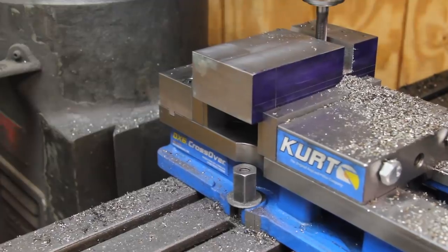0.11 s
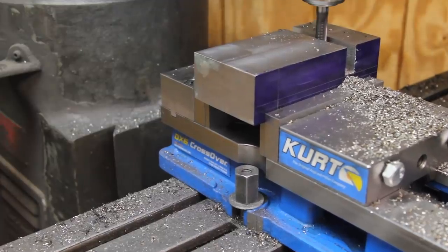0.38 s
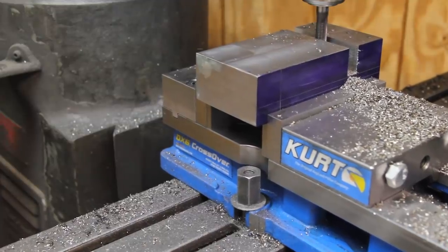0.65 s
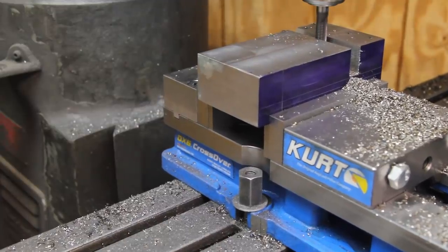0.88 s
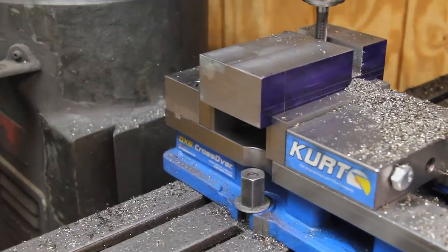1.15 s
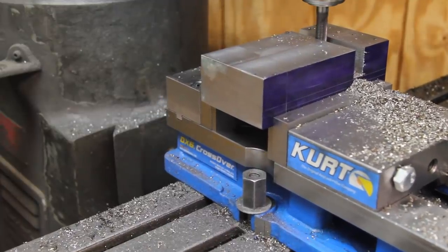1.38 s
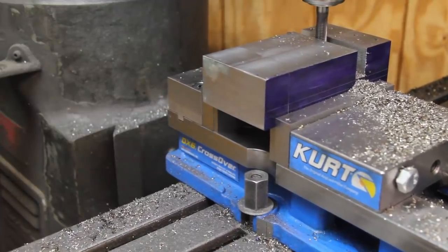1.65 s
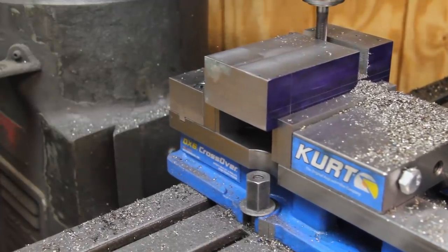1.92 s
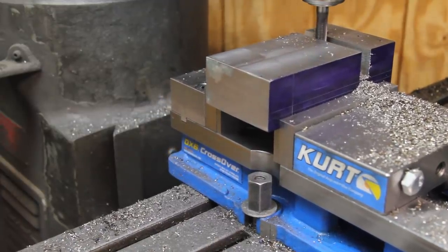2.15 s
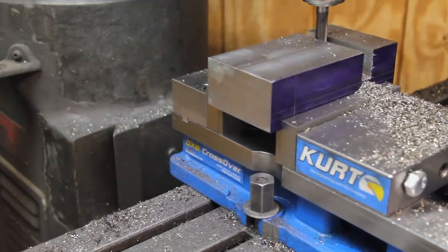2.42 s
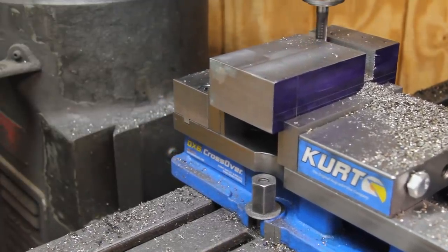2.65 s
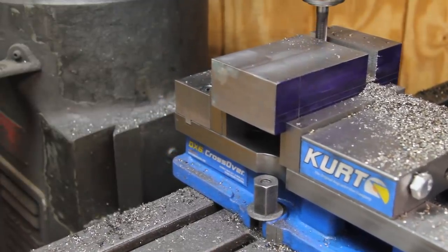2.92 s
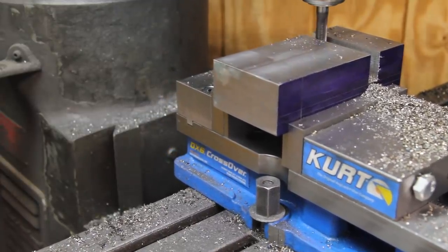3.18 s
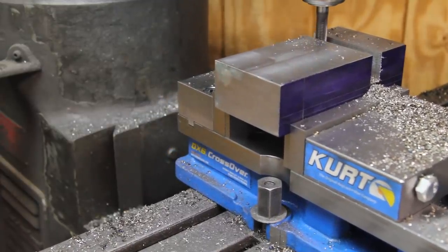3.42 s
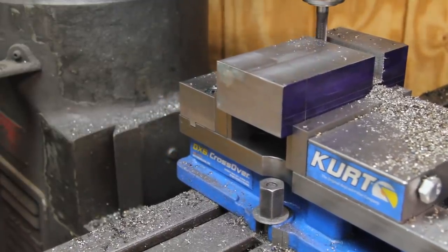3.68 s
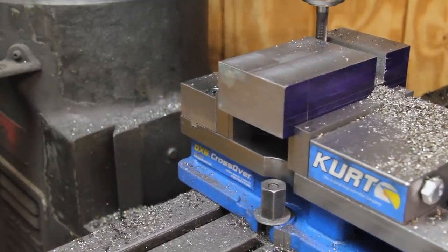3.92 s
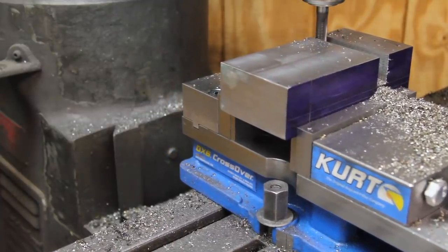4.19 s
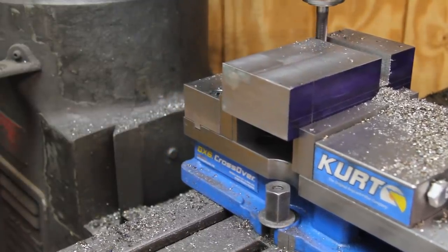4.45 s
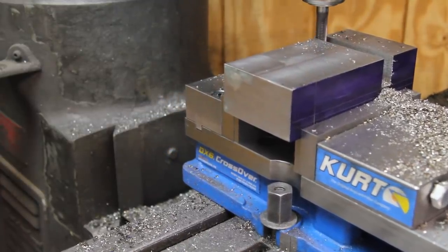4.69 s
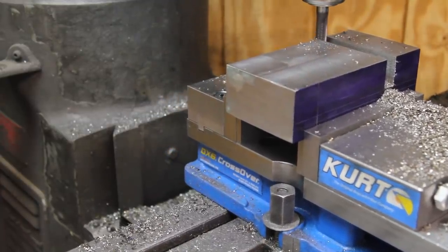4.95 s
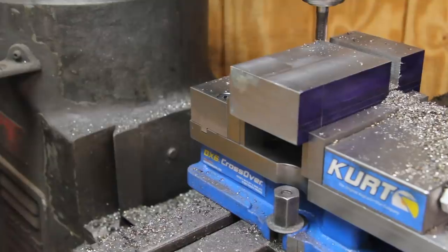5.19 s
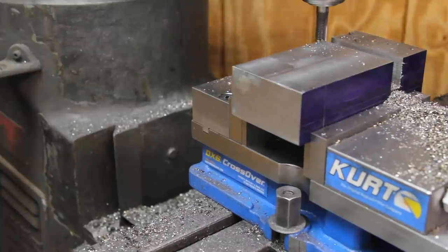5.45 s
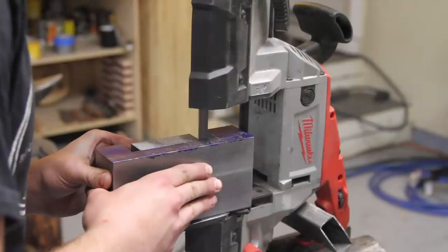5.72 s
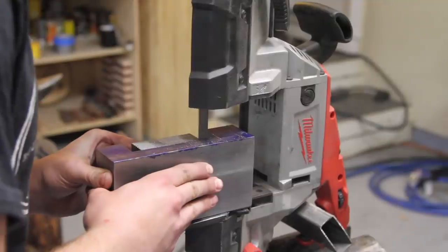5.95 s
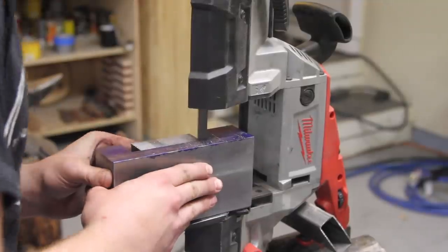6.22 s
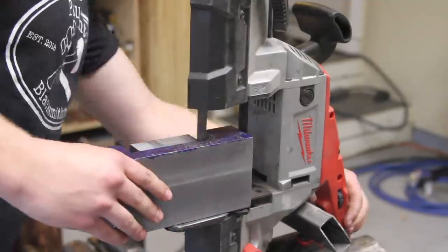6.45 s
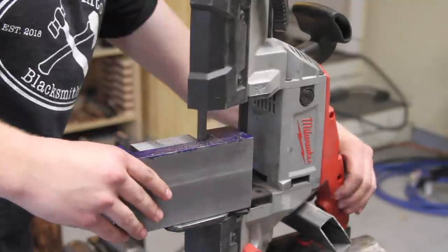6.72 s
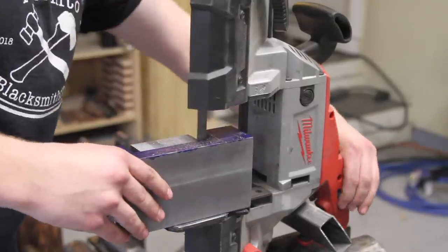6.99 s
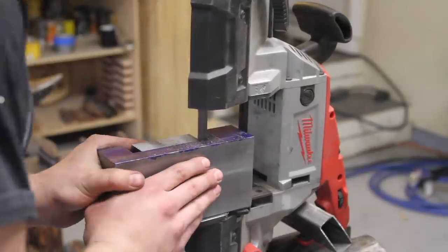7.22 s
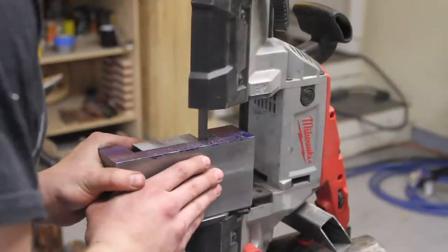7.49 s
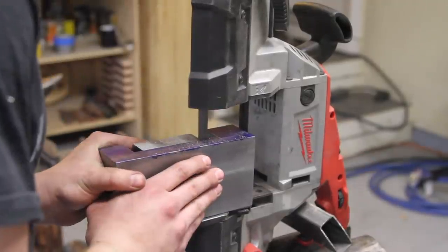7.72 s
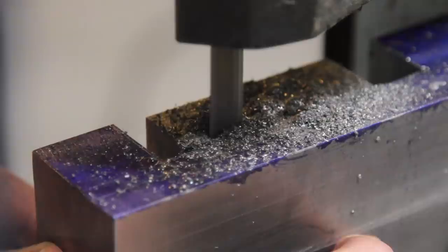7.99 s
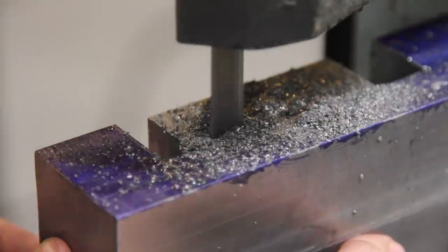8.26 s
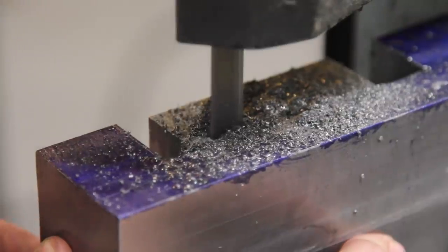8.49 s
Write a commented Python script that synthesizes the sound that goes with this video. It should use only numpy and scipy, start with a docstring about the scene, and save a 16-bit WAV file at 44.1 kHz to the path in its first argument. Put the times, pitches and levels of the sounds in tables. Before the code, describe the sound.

A steady, harsh milling drone fills the start, its high squeal swelling in uneven bursts over gritty noise. The cutter leaves the metal and the machine spins freely, smoother and a touch higher. Then a sudden change to a softer portable band saw: bright hiss, faint ringing, low frame rumble and a motor whine that dips and climbs. Dry, close sound, practically centred.

```python
"""A belt-driven mill cuts steel, loud enough to overload the microphone: chattering tones over scraping noise.
Near 5 s the cutter leaves the steel, the load goes and all shafts speed up; their tones are sums of sines,
joined by broad, blurred high tones made of narrow noise bands. A hard cut leads to a quieter band saw sawing
a steel block: a thin motor whine that follows the load, made of three sines, over filtered noise for
blade hiss, ringing and frame rumble. Near 8 s the hiss is heard from close by."""
import sys
import numpy as np
from scipy import signal
from scipy.fft import rfft, irfft, next_fast_len
from scipy.io import wavfile
from scipy.ndimage import uniform_filter1d

SR = 44100
rng = np.random.default_rng(int(sys.argv[2]) if len(sys.argv) > 2 else 0)


def bounce(signal):
    """Save signal as a 16-bit WAV file at the path given by the first command-line argument."""
    frames = np.transpose(np.atleast_2d(signal))
    limited = np.clip(frames, -1, 1)
    pcm = np.round(limited * 32767).astype(np.int16)
    wavfile.write(sys.argv[1], SR, pcm)


def to_linear_factor(level_db):
    """Convert decibel levels (scalar or array-like) to linear amplitude factors."""
    exponent = np.asarray(level_db, float) / 20
    return 10 ** exponent


N = 380141  # length in samples
CUT_S, FADE_S = 5.692, 0.008  # middle and length of the change from mill to saw
MILL_END = round((CUT_S + .05) * SR)  # sample at which the mill tones stop, after the change

# how deep the cutter is in the steel: t/s, load (clipped to 0-1), overall lift of the mill/dB
MILL_LOAD = [(0, 1.01, 3.5), (4.6, 0.98, 4), (4.75, 0.73, 4), (4.9, .45, 5), (5.02, 0.03, 3.4),
             (5.7, 0.02, 3.5)]
# turning rates: f/Hz under full load, f/Hz running free, unsteadiness under full load (share of the rate)
SPINDLE_RATE, PULLEY_RATE, MOTOR_RATE = (90.2, 91.33, .0012), (15.98, 16.27, .0006), (549.6, 562.3, .002)
GEAR_RATE = (3520, 3652, .0012)
# tones of each shaft, before the overall lift: multiple of its rate, level/dB cutting, level/dB free
SPINDLE_TONES = [(4, -63, -70), (6, -63, -70), (8, -50, -66), (12, -50, -70), (36, -52, -70),
                 (44, -51, -67), (47, -54, -69), (49, -59, -53), (51, -53, -70), (53, -49, -58),
                 (55, -52, -55), (56, -48, -55), (57, -64, -51), (59, -47, -52), (60, -44, -70),
                 (62, -45, -70), (63, -70, -53), (64, -38, -54), (65, -52, -57), (66, -46, -67),
                 (67, -57, -55), (68, -51, -65), (70, -57, -61), (73, -54, -46), (80, -49, -56),
                 (81, -70, -51), (82, -50, -47), (85, -56, -59), (87, -67, -53), (89, -62, -53),
                 (95, -56, -51), (96, -58, -51), (97, -70, -55), (99, -62, -55), (101, -56, -56),
                 (102, -46, -60), (103, -70, -44), (104, -56, -55), (105, -55, -51), (134, -70, -53),
                 (137, -70, -56)]
PULLEY_TONES = [(12, -65, -69), (24, -54, -48), (25, -53, -59), (30, -52, -50), (31, -57, -61),
                (36, -63, -63), (42, -56, -52), (48, -63, -61), (54, -58, -60), (60, -60, -58),
                (66, -53, -47), (67, -57, -60), (72, -49, -56), (78, -54, -48), (84, -58, -60),
                (90, -57, -48), (91, -56, -60), (95, -57, -64), (96, -60, -50), (101, -54, -70),
                (102, -55, -58), (106, -59, -70), (108, -55, -56), (114, -55, -45), (119, -59, -70),
                (123, -55, -60), (126, -50, -47), (127, -48, -56), (128, -55, -70), (129, -57, -52),
                (132, -52, -58), (134, -57, -70), (140, -58, -70), (144, -55, -54), (150, -52, -70),
                (151, -55, -70), (156, -56, -53), (168, -57, -70), (174, -53, -50), (179, -54, -70)]
MOTOR_TONES = [(8, -56, -52), (9, -52, -50), (10, -59, -60), (11, -55, -58), (14, -55, -57), (16, -58, -47),
               (18, -51, -52), (20, -50, -49), (21, -51, -49), (23, -60, -58), (24, -70, -60),
               (27, -65, -63)]
# tone of a gear mesh in the head, same columns
GEAR_TONES = [(1, -39, -44.5)]
# spindle and motor tones between the whole multiples, same columns
SPINDLE_BETWEEN = [(48.55, -55, -70), (54.5, -47, -70)]
MOTOR_BETWEEN_TONES = [(6.497, -47, -60), (26.06, -62, -55)]
# the cutter's upper bending mode sings in bursts: start t/s, length/s, level over its usual one/dB
CHATTER_BURSTS = [(0.0, 0.18, -0.5), (0.232, .13, 2.5), (0.4, .13, 2), (.66, 0.23, 1), (1.056, 0.042, -3),
                  (1.153, .1, 1), (1.29, 0.15, 2), (1.657, .07, 3), (1.804, 0.14, 3), (2.15, .18, 4.5),
                  (2.364, 0.59, 1), (3.07, 0.33, 1.5), (3.424, .14, 1), (3.6, 0.31, 0.5), (4.002, 0.36, 1),
                  (4.387, .1, -2), (4.538, .21, -1)]
CHATTER_MULTIPLES = 64, 60  # spindle multiples at the upper and lower bending mode
LULL_DB, BURST_EDGE_S = -11, .03  # level between bursts; length of their rise and fall
LOWER_FOLLOWS, LOWER_WAVER_DB = .3, 2.0  # lower mode: share of the upper swing, and its own wander
# colour of the scraping noise, cutting and free: f/Hz, relative level per Hz/dB
CUTTING_COLOUR = [(15, -47), (25, -20.5), (306, -16.5), (390, -12.5), (974, -11), (1110, -4), (1350, -4),
                  (2070, -3), (3270, -3.5), (3550, -2), (4170, -4), (5610, -1.5), (6590, -6), (9350, -5),
                  (15600, -15.5)]
FREE_COLOUR = [(15, -49), (25, -24), (247, -17.5), (390, -8), (616, -17), (668, -8), (923, -13),
               (1080, -0.5), (1380, -4), (1810, 0), (3360, -3), (3640, -2), (4770, -11), (9350, -7.5),
               (15600, -11.5)]
CUTTING_DB, FREE_DB = -31, -33  # before load, knocks and overall lift
# broad, blurred high tones of the running mill, before the overall lift:
# f/Hz, width/Hz, level/dB cutting, level/dB free
BLURRED_TONES = [(1160, 380, -49.5, -49), (2015, 280, -46, -51), (2770, 290, -42, -43.5),
                 (4900, 360, -60, -58), (5600, 670, -52, -53), (6680, 67, -51, -54), (7115, 140, -48, -54),
                 (8480, 370, -49.5, -50), (9260, 190, -46.5, -45), (9800, 72, -61, -49),
                 (10500, 76, -67, -50), (12020, 220, -48, -44), (12780, 700, -48, -50),
                 (14300, 200, -59, -61)]

# colour of the saw's whine, held until the next row: from t/s, level/dB of multiples 1, 2 and 3
WHINE_COLOUR = [(5.69, -54, -50, -46), (6.25, -56, -57, -51), (6.5, -58.5, -52, -46), (6.83, -65, -59, -60),
                (6.98, -64, -53, -63), (7.13, -52, -59, -52), (7.3, -58, -53, -55), (7.58, -57, -50, -53),
                (8.075, -62, -47, -43.5), (8.18, -51, -56, -43.5)]
# saw motor speed, rising when the push eases, sagging while the trigger is let go: t/s, commutator f/Hz
SAW_MOTOR_SPEED = [(5.69, 3125), (6.23, 3120), (6.29, 3205), (6.37, 3200), (6.47, 3130), (6.82, 3105),
                   (6.85, 2710), (6.96, 2770), (7.02, 3280), (7.08, 3460), (7.13, 3460), (7.25, 3410),
                   (7.33, 3370), (7.6, 3316), (8.17, 3316), (8.26, 3440), (8.38, 3370), (8.55, 3472),
                   (8.62, 3460)]
# colour of the tooth hiss from afar and from close by: f/Hz, relative level per Hz/dB
HISS_FAR = [(1200, -19.5), (2100, -12.5), (3000, -8), (4100, -3.5), (4700, -3), (6400, 0), (7800, -1),
            (9300, 0.5), (11600, -1.5), (13600, 0.5), (15000, -0.5), (16000, -7)]
HISS_CLOSE = [(1200, -32), (2100, -13), (3000, -10), (4100, -5.5), (5600, -2), (6600, -1), (8500, -0.5),
              (10500, -0.5), (12000, -2.5), (13600, -5), (15000, -5), (16000, -10)]
CLOSER_S = 8.073  # from here on the saw is heard from close by
HISS_DB, HISS_SAG_DB_PER_S, HISS_NEAR_DB = -35.5, .5, -35  # level at the cut, its slow fall, level close by
# guides and housing of the saw ring faintly with the teeth: f/Hz, width/Hz, usual level/dB
SAW_RINGING = [(6450, 150, -55), (7460, 40, -59), (9180, 80, -56), (12500, 120, -58), (13720, 150, -55)]
# colour of the frame rumble: f/Hz, relative level per Hz/dB
FRAME_COLOUR = [(15, -32), (25, -2), (27, 0), (71, -5), (624, -5), (674, -4.5), (1770, -5), (2500, -7.5),
                (3250, -7.5), (5500, -120)]
RUMBLE_DB, RUMBLE_NEAR_DB = -53, -49.5  # usual level from afar and from close by
TRIGGER_OFF_S, TRIGGER_ON_S, COASTING_DB = 6.84, 6.96, -4  # the frame quietens while the motor coasts
MILL_TOP_DB, SAW_TOP_DB = -23.4, -25.5  # ceiling of the overloaded microphone


def mill():
    """Shafts and a gear mesh sing, with blurred high tones, over the noise of the scraping cutter."""
    load, overall_db = in_time(MILL_LOAD)
    load = np.clip(load, 0, 1)
    spindle, pulley = turning(SPINDLE_RATE, load), turning(PULLEY_RATE, load)
    sung = spindle_tones(spindle, load) + motor_tones(load)
    sung += tones(PULLEY_TONES, pulley, load, waver_db=1.2, smear=.004)
    sung += tones(GEAR_TONES, turning(GEAR_RATE, load), load, waver_db=.8, smear=.4)
    return to_linear_factor(overall_db) * (sung + blurred_tones(spindle, load) + scraping(pulley, load))


def spindle_tones(spindle, load):
    """Multiples of the spindle rate; under load, chatter carries those around each bending mode with it."""
    swells_db = [db[:MILL_END] for db in chatter()]

    def chatter_lift_db(multiple):
        return sum(db * np.exp(-((multiple - centre) / 1.5) ** 2)
                   for db, centre in zip(swells_db, CHATTER_MULTIPLES))

    table = SPINDLE_TONES + SPINDLE_BETWEEN
    return tones(table, spindle, load, waver_db=1.3, smear=.014, lift_db=chatter_lift_db)


def chatter():
    """The cutter bends to and fro in bursts: swells in dB of its upper and lower bending mode."""
    t = np.arange(N) / SR
    upper = np.full(N, float(LULL_DB))
    for start, length, db in CHATTER_BURSTS:
        upper[(t >= start) & (t < start + length)] = db
    upper = soften(upper, BURST_EDGE_S)
    lower = LOWER_FOLLOWS * upper + LOWER_WAVER_DB * drift(6.0)
    return upper, lower


def motor_tones(load):
    """Multiples of the motor rate; an uneven rotor flutters them at 41.5 Hz as the load goes."""
    flutter = 1 + 0.27 * (1 - load) * np.cos(2 * np.pi * 41.5 * np.arange(N) / SR)
    table = MOTOR_TONES + MOTOR_BETWEEN_TONES
    return flutter * tones(table, turning(MOTOR_RATE, load), load, waver_db=1.8, smear=.1)


def blurred_tones(spindle, load):
    """Broad, blurred high tones of the running mill: narrow noise bands that swell with each bite."""
    bites = 1 + 0.11 * load * np.cos(2 * spindle)  # two bites a spindle turn
    noise = rng.standard_normal(N) * bites
    blurred = np.zeros(N)
    for hz, width_hz, cutting_db, free_db in BLURRED_TONES:
        db = free_db + load * (cutting_db - free_db)
        blurred += to_linear_factor(db) * resonance(noise, hz, width_hz)
    return blurred


def scraping(pulley, load):
    """Noise that throbs with the belt pulley and blends from the cutting to the free colour."""
    # once, six and twelve times a pulley turn
    knock = 1 + 0.049 * np.cos(pulley) + 0.15 * np.cos(6 * pulley) + 0.27 * np.cos(12 * pulley)
    cutting = to_linear_factor(CUTTING_DB) * coloured(CUTTING_COLOUR)
    free = to_linear_factor(FREE_DB) * coloured(FREE_COLOUR)
    return knock * (np.sqrt(load) * cutting + np.sqrt(1 - load) * free)


def turning(rates, load):
    """Angle of a shaft or gear in radians: load slows it down and makes it unsteady."""
    cutting_hz, free_hz, unsteady = rates
    hz = free_hz + load * (cutting_hz - free_hz + cutting_hz * unsteady * drift(3.996))
    return 2 * np.pi * np.cumsum(hz) / SR


def tones(table, angle, load, waver_db, smear, lift_db=lambda multiple: 0):
    """Sines that waver in level and phase, more under load; the phase of high multiples blurs most."""
    out = np.zeros(N)
    angle, load = angle[:MILL_END], load[:MILL_END]
    for multiple, cutting_db, free_db in table:
        db = free_db + load * (cutting_db - free_db + lift_db(multiple))
        db = db + waver_db * (0.34 + 0.77 * load) * drift(7.8, size=MILL_END)
        blur = smear * (0.12 + 0.43 * load) * drift(8.0, size=MILL_END)
        phase = multiple * (angle + blur) + rng.uniform(0, 2 * np.pi)
        out[:MILL_END] += np.sqrt(2) * to_linear_factor(db) * np.sin(phase)  # root 2: from rms to peak
    return out


def saw():
    """Motor whine over blade hiss, faint ringing and frame rumble."""
    near = np.arange(N) / SR >= CLOSER_S
    return saw_whine() + blade_hiss(near) + saw_ringing() + frame_rumble(near)


def saw_whine():
    """Three multiples of the commutator rate, shaken by the teeth, with levels stepping over time."""
    hz, = in_time(SAW_MOTOR_SPEED)
    starts, *levels = np.transpose(WHINE_COLOUR)
    row = np.maximum(np.searchsorted(starts, np.arange(N) / SR) - 1, 0)
    shake = .0024 * drift(45.0)
    angle = 2 * np.pi * np.cumsum(hz * (1 + shake)) / SR
    whine = np.zeros(N)
    for multiple, level in enumerate(levels, 1):
        db = soften(level[row], .015) + 2.0 * drift(23.0)
        whine += np.sqrt(2) * to_linear_factor(db) * np.sin(multiple * angle + multiple)
    return whine


def blade_hiss(near):
    """Flickering noise of the teeth, slowly sinking, then heard from close by."""
    since_cut = np.maximum(np.arange(N) / SR - CUT_S, 0)
    db = np.where(near, HISS_NEAR_DB, HISS_DB - HISS_SAG_DB_PER_S * since_cut)
    hiss = np.where(near, coloured(HISS_CLOSE), coloured(HISS_FAR))
    return to_linear_factor(db + 0.54 * drift(18.0)) * hiss


def saw_ringing():
    """Guides and housing ring at their own pitches, driven by noise of the teeth."""
    teeth = rng.standard_normal(N)
    return sum(to_linear_factor(db + 2.0 * drift(3.6)) * resonance(teeth, hz, width_hz)
               for hz, width_hz, db in SAW_RINGING)


def frame_rumble(near):
    """Mostly low noise of the saw frame, quieter while the motor coasts."""
    t = np.arange(N) / SR
    coasting = soften(1. * ((t > TRIGGER_OFF_S) & (t < TRIGGER_ON_S)), 0.047)
    db = np.where(near, RUMBLE_NEAR_DB, RUMBLE_DB + COASTING_DB * coasting)
    return to_linear_factor(db + 0.41 * drift(18.0)) * coloured(FRAME_COLOUR)


def second_shot():
    """Share of the saw scene: 0 before the cut, 1 after it."""
    return np.clip((np.arange(N) / SR - CUT_S) / FADE_S + .5, 0, 1)


def rms_one(x):
    """Scales a sound to rms 1."""
    return x / np.sqrt(np.mean(x ** 2) + 1e-20)


def in_time(rows):
    """Draws straight lines between the rows of a table, one curve for each column after the time."""
    s, *columns = np.transpose(rows)
    return [np.interp(np.arange(N) / SR, s, column) for column in columns]


def drift(rate_hz, size=N):
    """Slow chance of spread 1: noise at every 50th sample through two equal low-passes of this corner."""
    r = np.exp(-100 * np.pi * rate_hz / SR)
    noise = rng.standard_normal(size // 50 + 1002)
    slow = signal.lfilter([1], [1, -2 * r, r * r], noise)[1000:]  # drop the filter's start
    return np.interp(np.arange(size) / 50, np.arange(len(slow)), rms_one(slow))


def coloured(spectrum):
    """Noise shaped to the given spectrum; rms 1."""
    size = next_fast_len(N)
    hz, db = np.transpose(spectrum)
    bin_hz = np.arange(size // 2 + 1) * SR / size
    shape = to_linear_factor(np.interp(np.log(bin_hz + 1), np.log(hz), db))
    return rms_one(irfft(rfft(rng.standard_normal(size)) * shape, size)[:N])


def resonance(x, hz, width_hz):
    """One resonance passed twice, so that little is left on either side of it; rms 1."""
    r = np.exp(-1.5 * np.pi * width_hz / SR)
    section = [1, 0, -1, 1, -2 * r * np.cos(2 * np.pi * hz / SR), r * r]
    return rms_one(signal.sosfilt([section, section], x))


def soften(steps, edge_s):
    """Gives steps sloped edges by a moving average."""
    return uniform_filter1d(steps, max(int(edge_s * SR), 1), mode="nearest")


def scene():
    """The mill, then the saw, alike on both sides."""
    after = second_shot()
    return np.tile((1 - after) * mill() + after * saw(), (2, 1))


def top_cut(x):
    """Nothing passes above the cut-off."""
    return signal.sosfilt(signal.butter(12, 16790, fs=SR, output="sos"), x)


def record(dry):
    """The microphone overloads at a ceiling set for each shot; the sides differ only in deep rumble."""
    top = to_linear_factor(MILL_TOP_DB + (SAW_TOP_DB - MILL_TOP_DB) * second_shot())
    knee = 9.0  # higher bends more sharply into the ceiling
    clipped = dry / (1 + np.abs(dry / top) ** knee) ** (1 / knee)
    low_pass = signal.ellip(14, .3, 60, 15740, fs=SR, output="sos")  # cuts the top above 15740 Hz
    cut = signal.sosfilt(low_pass, clipped)
    rumble = to_linear_factor(-84) * coloured([(20, 0), (60, -6), (120, -20), (300, -50)])  # f/Hz, relative level/dB
    offset = .0005  # constant shift of the wave
    mix = cut + rumble * [[1], [-1]] + offset
    return top_cut(mix)


dry = scene()
out = record(dry)
bounce(out)
```